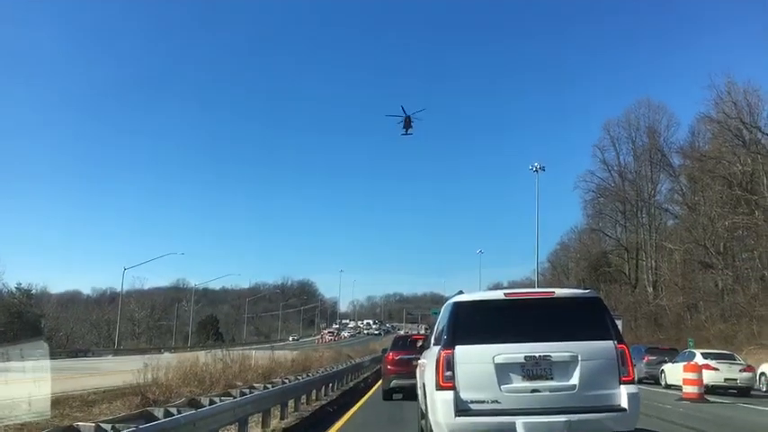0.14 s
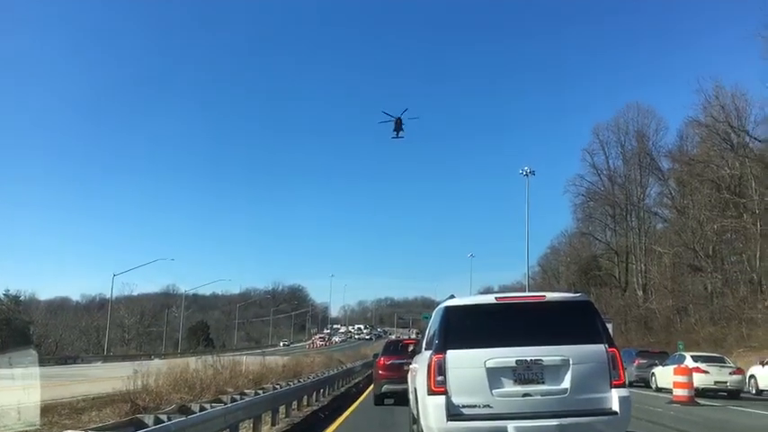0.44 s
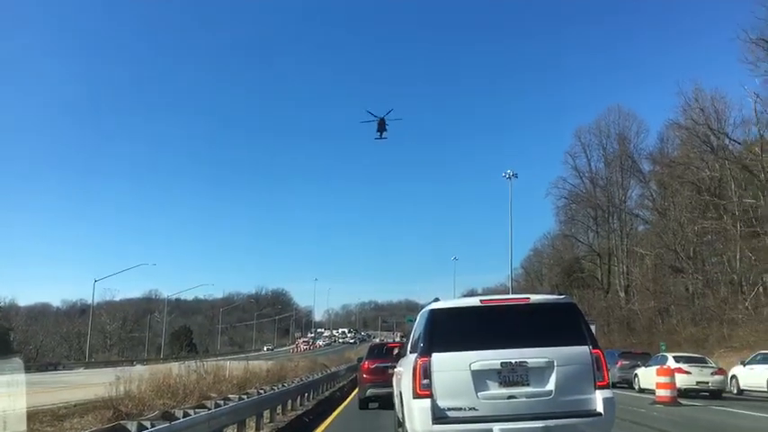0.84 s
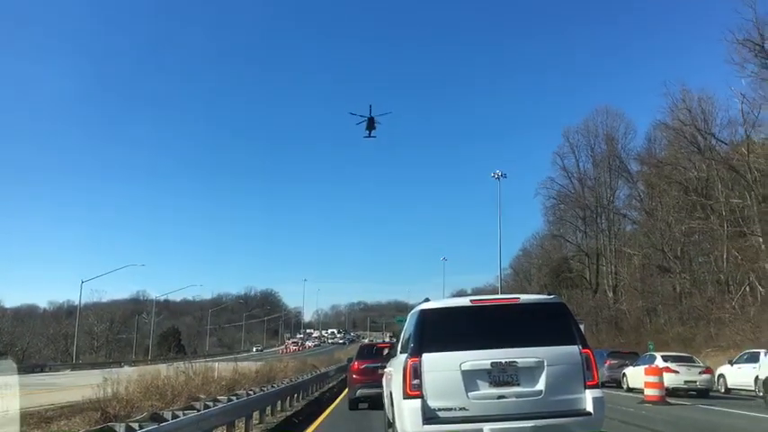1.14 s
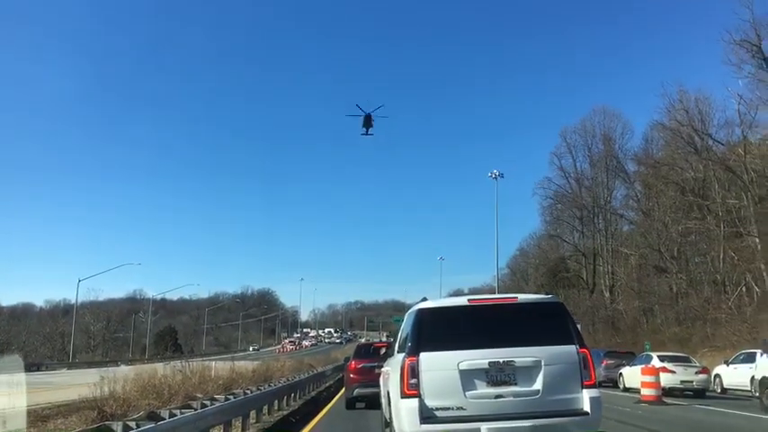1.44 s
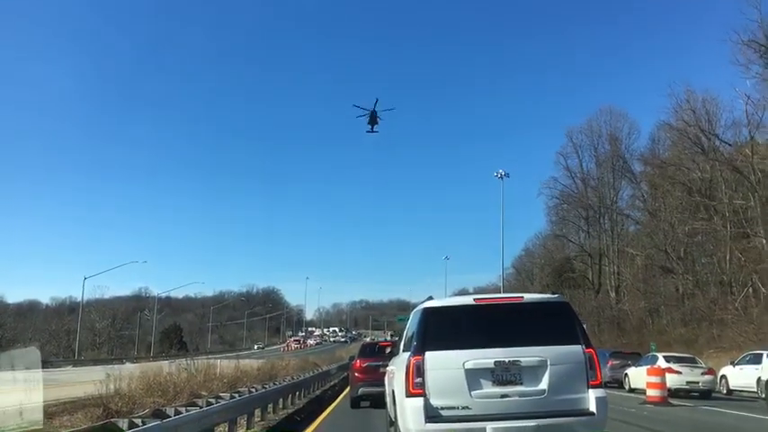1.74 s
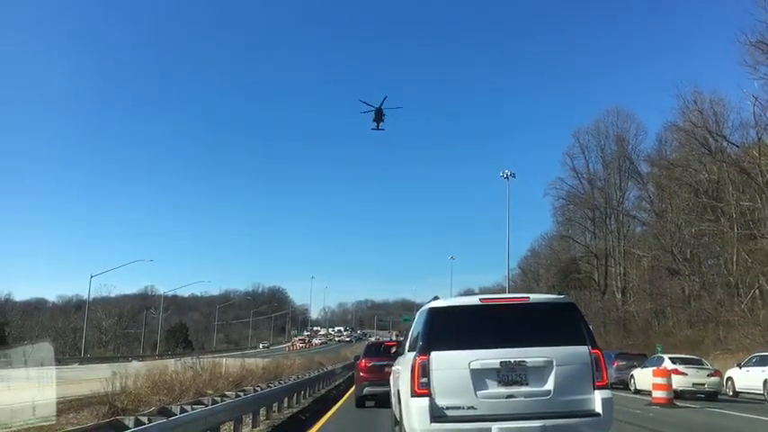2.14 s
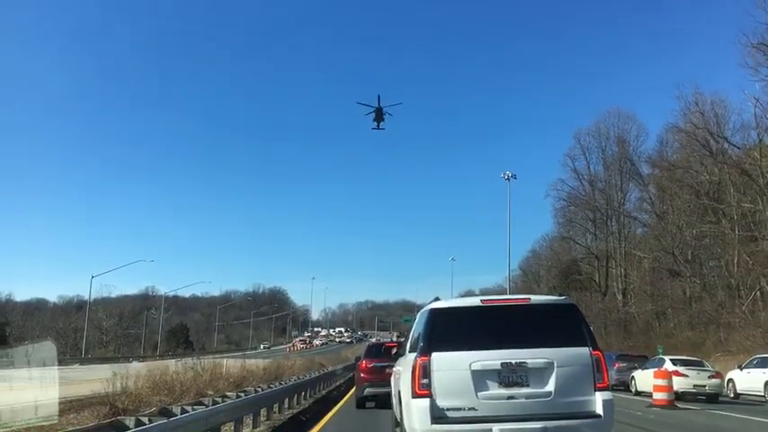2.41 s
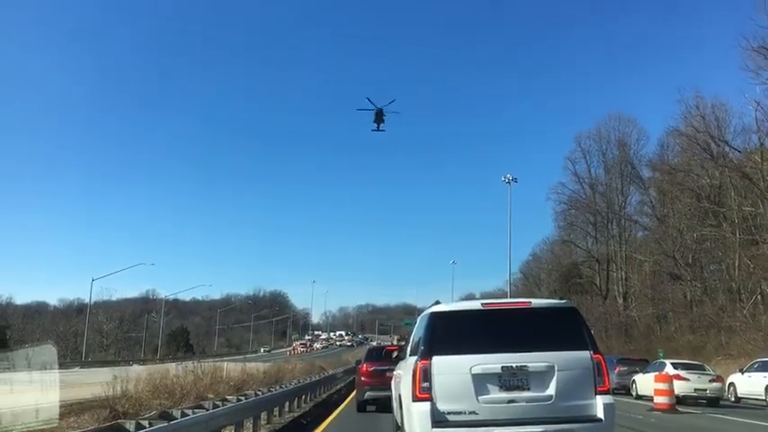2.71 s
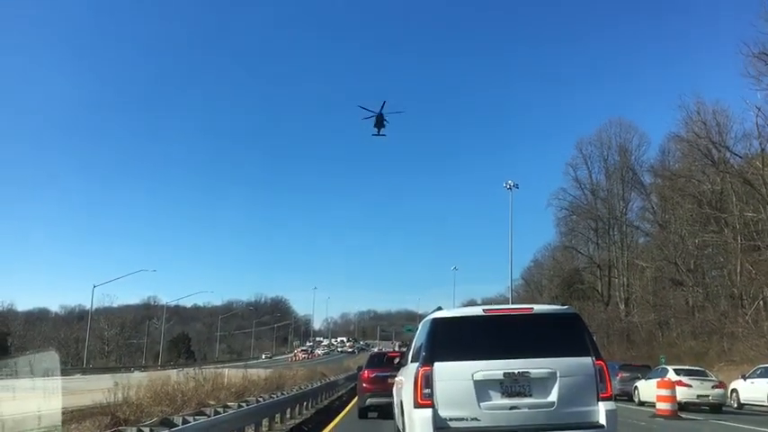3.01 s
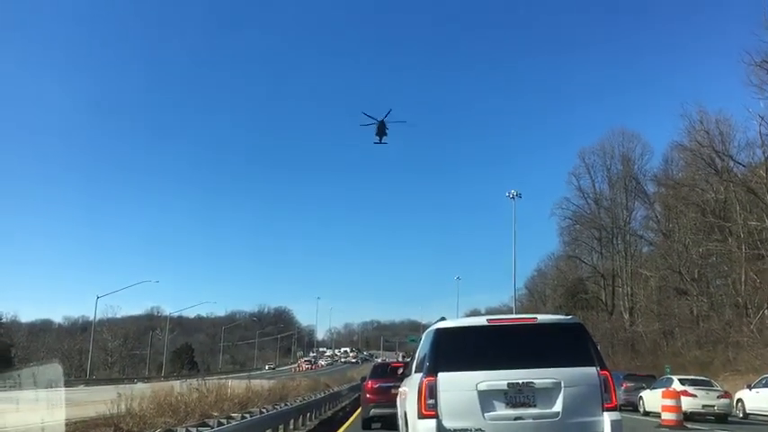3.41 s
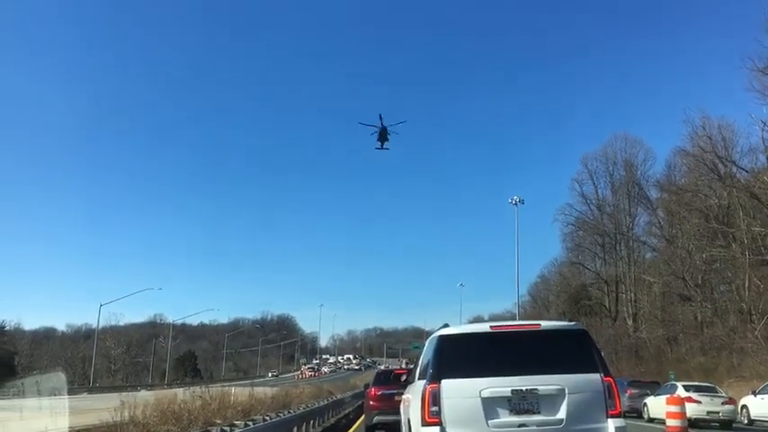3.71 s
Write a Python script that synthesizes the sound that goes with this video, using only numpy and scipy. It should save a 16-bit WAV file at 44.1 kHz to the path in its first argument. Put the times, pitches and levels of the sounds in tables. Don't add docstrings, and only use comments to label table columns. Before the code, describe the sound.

Rapid helicopter rotor pulses, about twenty-six a second, run from start to finish, muffled by car glass. Slaps are clearer early, then softer and blurrier amid rushing air, over quiet idle hum, heard from a phone inside.

```python
import sys
import numpy as np
from scipy import signal
from scipy.fft import rfft, irfft
from scipy.io import wavfile
from scipy.ndimage import uniform_filter1d

SR = 44100
rng = np.random.default_rng(int(sys.argv[2]) if len(sys.argv) > 2 else 0)


def linear_from_db(decibels):
    return 10 ** (np.asarray(decibels, float) / 20)


def file_out(sig):
    cols = np.atleast_2d(sig).T
    lim = np.clip(cols, -1, 1)
    pcm = np.round(lim * 32767).astype(np.int16)
    wavfile.write(sys.argv[1], SR, pcm)


N = 170226
BLADE_HZ = 26.2

# (time [s], change of distance [m])
DRIFT = [
    (0, 0),
    (.4, -.75),
    (.8, -1.2),
    (1.25, -1.6),
    (1.8, -1.4),
    (2.3, -1),
    (2.8, 0),
    (3.3, 1.3),
    (3.86, 2.6),
]
# (time [s], thump [dB], slap [dB], roar [dB], brightness [dB], tip hiss [dB])
TURN = [(0, -31.5, -35.5, -51.5, 8, -70), (0.199, -38.5, -39, -43.5, -3.5, -70),
        (0.449, -34, -37, -45, 0, -67.5), (0.798, -32, -38, -45, -3, -70.5),
        (1.101, -32.5, -37.5, -40.5, -10.5, -69.5), (1.4, -33.5, -38.5, -45.5, 0.5, -73.5),
        (1.65, -32.5, -34.5, -42, -3.5, -67.5), (1.901, -33, -38.5, -49.5, 4.5, -63.5),
        (2.149, -31, -39.5, -41, 4, -65), (2.4, -30.5, -48, -45.5, 8.5, -68.5),
        (2.65, -34.5, -42, -43, 4, -72.5), (2.848, -31.5, -41.5, -42, 4, -74),
        (3.1, -32, -42.5, -39.5, 0, -73.5), (3.301, -32, -37.5, -36.5, -3.5, -74),
        (3.561, -47, -43, -38.5, 1.5, -72), (3.66, -33, -38.5, -34.5, -2, -72),
        (3.75, -45, -44.5, -39.5, 4, -68.5), (3.86, -31, -50.5, -40, 6, -73)]
# (multiple of blade rate, level at the start [dB], fade [dB/s])
THUMP = [(2, 2, -1), (3, -19, -2.5), (4, -12.5, -4.5), (5, -20.5, -2.5), (6, -22.5, -0.5), (8, -25, 0.35)]
BLADE_LEVELS = [0.33, -0.13, -0.3, -0.14, -0.35]
# (time [s], level [dB])
ACCENTS = [(0, -8.5), (0.11, -4), (0.19, 8.5), (0.23, 2.5), (0.31, -2.5), (0.34, -2), (0.38, 3), (0.42, -1),
           (0.53, -1.5), (0.57, 4), (0.76, 3.5), (0.88, -2), (0.92, 2.0), (0.99, 1.5), (1.03, 1),
           (1.11, -1.5), (1.18, 1.5), (1.22, 2.0), (1.26, 5), (1.34, -3.5), (1.37, -2.5), (1.41, -2),
           (1.53, 1.5), (1.56, -2.5), (1.68, -3.5), (1.79, 1), (1.91, -2), (1.95, -2), (1.98, -2.0),
           (2.02, -5.5), (2.1, 2.5), (2.14, -6), (2.18, 3), (2.21, 4.5), (2.25, -2.5), (2.29, -8), (2.4, 0),
           (2.52, 5.5), (2.67, -6), (2.75, 4), (2.79, 2), (2.9, -4.5), (3.02, -5.5), (3.05, -6.5),
           (3.13, -2.5), (3.28, 2.5), (3.32, -6), (3.51, 3), (3.63, 2), (3.74, -5), (3.82, -9)]
# (frequency [Hz], gain [dB])
CRACK = [(350, -15.5), (550, 13), (800, -10.5), (1200, -15.5), (1800, -33), (4000, -81)]
# (frequency [Hz], gain [dB])
TIP = [(1000, -10.5), (1550, 8), (1950, 7), (2300, 0.5), (2800, -4), (3300, -2.5), (4300, -12),
       (6500, -45.5)]
# (frequency [Hz], level [dB], t60 [s])
CABIN = [(199, -15.5, 0.11), (242, -10, 0.022), (321.7, 1, 0.11), (343.7, 3, 0.1), (373.2, -3.5, 0.044),
         (410, -5.5, 0.024), (497.3, -17, 0.073), (638.5, -19, 0.065), (805, -19, 0.1), (864, -24.5, 0.092),
         (989, -22, 0.035), (1062, -26, 0.077), (1163, -33, 0.031), (1785, -41, 0.017)]
# (frequency [Hz], gain [dB])
GLASS = [(175, -28), (220, -11.5), (400, -18.5), (700, -30.5), (1100, -35.5), (1600, -51), (2600, -54.5),
         (4600, -77)]
# (multiple of its blade rate, level [dB])
TAIL = [(1, -49), (2, -59)]
# (multiple of idle rate, level [dB])
IDLE = [(2, -47), (3, -56)]
# (frequency [Hz], gain [dB])
ROAD = [(25, -29.5), (42, -4.5), (70, -9), (140, -10), (175, -12), (215, -8.5), (600, -19), (3000, -59.5)]
# (frequency [Hz], gain [dB])
HISS = [(3000, 0), (4900, -4), (6300, -1), (7600, -4.5), (9000, -1), (10400, -8), (11500, -5), (15500, -12)]


def level(x, db):
    return x * linear_from_db(db) / np.sqrt(np.mean(x ** 2))


def noise():
    return rng.standard_normal(N)


def colour(x, points):
    hz, db = np.array(points, float).T
    grid = np.maximum(np.arange(4097) * SR / 8192, 1)
    cepstrum = irfft(np.interp(np.log(grid), np.log(hz), db) * np.log(10) / 20)
    cepstrum[1:4096] *= 2
    cepstrum[4097:] = 0
    response = irfft(np.exp(rfft(cepstrum)))[:4096]
    return signal.fftconvolve(x, response)[:N]


def walk(rate):
    k = int(SR / rate)
    held = np.repeat(rng.standard_normal(N // k + 1), k)
    return 1.3 * uniform_filter1d(uniform_filter1d(held, k), k)[:N]


def tones(t, hz, partials, wobble_db):
    total = 0
    for k, db in partials:
        gain = np.sqrt(2) * linear_from_db(db + wobble_db * walk(4.6))
        total = total + gain * np.cos(2 * np.pi * k * hz * t)
    return total


def burst(hits, rise_s, fall_s):
    s = np.arange(SR // 10) / SR
    return signal.fftconvolve(hits, (1 - np.exp(-s / rise_s)) * np.exp(-s / fall_s))[:N]


def cabin_echoes():
    s = np.arange(SR // 5) / SR
    t60_s, echo_db = 0.06, 5.0
    echoes = rng.standard_normal(len(s)) * np.exp(-np.log(1000) * s / t60_s)
    spectrum = rfft(echoes)
    echoes = irfft(spectrum / uniform_filter1d(abs(spectrum), size=9), len(s))
    return echoes * linear_from_db(echo_db) / np.sqrt(np.sum(echoes ** 2))


def cabin(x, bright_db, echoes):
    t = np.arange(len(echoes)) / SR
    ring = np.zeros(len(t))
    for hz, db, t60 in CABIN:
        mode = np.exp(-np.log(1000) * t / t60) * np.sin(2 * np.pi * hz * t)
        ring += linear_from_db(db) * mode * 30 / (t60 * SR)
    ring *= 1 - np.exp(-t / 0.0039)
    through = colour(x, GLASS)
    y = signal.fftconvolve(x, ring)[:N] + 0.54 * through
    y = y + signal.fftconvolve(through, echoes)[:N]
    low = signal.sosfilt(signal.butter(2, 900, fs=SR, output="sos"), y)
    return low + linear_from_db(bright_db) * (y - low)


def thump(t, sent):
    total = 0
    for k, db, fade in THUMP:
        lead_s = 0.0085 if k < 4 else 0.002
        total = total + tones(sent + lead_s, BLADE_HZ, [(round(k), db + fade * t)], 0.54)
    return total


def blade_passes(t, sent):
    passes = np.arange(int(N / SR * BLADE_HZ) + 1)
    jitter, scatter = rng.standard_normal((len(passes), 2)).T
    at = np.interp(passes / BLADE_HZ, sent, t)
    turned = 1 / (1 + np.exp((2.3 - at) / 0.19))
    at = at + turned * 0.00491 + 0.00016 * (1 + 6 * turned) * jitter
    slap_db = np.array(BLADE_LEVELS)[passes % len(BLADE_LEVELS)] + 0.05 * scatter
    for s, db in ACCENTS:
        slap_db = slap_db + db * (passes == np.argmin(abs(at - s)))
    hits = np.zeros(N)
    hits[np.clip((at * SR).astype(int), 0, N - 1)] = linear_from_db(slap_db)
    return hits, np.interp(t, at, turned)


def slap(hits, gate, bright_db, echoes):
    band = signal.butter(1, [214, 690], "band", fs=SR, output="sos")
    pulse = cabin(signal.sosfilt(band, -hits), bright_db + 2.0, echoes)
    swish = cabin(gate * noise(), 10 + bright_db, echoes)
    crack = colour(burst(np.sqrt(hits), rise_s=0.0005, fall_s=0.004) * noise(), CRACK)
    return level(pulse, 0) + level(swish, -8) + level(crack, -18.5)


def tip_hiss(hits, turned, echoes):
    lead_s, steady, blur, echo = 0.0015, 0.2, 0.35, 0.19
    early = np.roll(np.cbrt(hits), -int(lead_s * SR))
    swell = burst(early, rise_s=0.003, fall_s=0.009)
    tip = (steady + blur * turned ** 2 + swell) * noise()
    tip = tip + echo * signal.fftconvolve(tip, echoes)[:N]
    return level(colour(tip, TIP), 0)


def roar(gate, bright_db, echoes):
    gusts = linear_from_db(1.3 * walk(29.93) + 0.79 * walk(5.72))
    air = (1 + 0.2 * gate) * gusts * noise()
    return level(cabin(air, 6 + 0.76 * bright_db, echoes), 0)


def tail_rotor(sent):
    lead_s, tail_hz = 0.0027, 101.5
    return tones(sent + lead_s, tail_hz, TAIL, 1.0)


def helicopter(t):
    turn = np.array(TURN).T
    thump_db, slap_db, roar_db, bright_db, tip_db = (np.interp(t, turn[0], c) for c in turn[1:])
    sent = t - np.interp(t, *np.array(DRIFT).T) / 343
    hits, turned = blade_passes(t, sent)
    echoes = cabin_echoes()
    gate = burst(hits, rise_s=0.00078, fall_s=0.0085)
    main = linear_from_db(thump_db) * thump(t, sent)
    main = main + linear_from_db(slap_db) * slap(hits, gate, bright_db, echoes)
    main = main + linear_from_db(tip_db) * tip_hiss(hits, turned, echoes)
    main = main + linear_from_db(roar_db) * roar(gate, bright_db, echoes)
    return main + tail_rotor(sent)


def engine_idle(t):
    lag_s, idle_hz = 0.003, 23.19
    return tones(t - lag_s, idle_hz, IDLE, 0.5)


def road_rumble():
    return level(linear_from_db(0.32 * walk(6.0)) * colour(noise(), ROAD), -45.5)


def microphone_hiss():
    return level(colour(noise(), HISS), -82)


def scene():
    t = np.arange(N) / SR
    return (helicopter(t) + engine_idle(t) + road_rumble() + microphone_hiss())[None]


def roll_off(x):
    return signal.sosfilt(signal.butter(12, 15750, fs=SR, output="sos"), x)


def record(dry):
    return roll_off(dry)


dry = scene()
out = record(dry)
file_out(out)
```